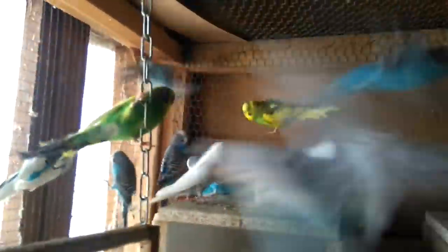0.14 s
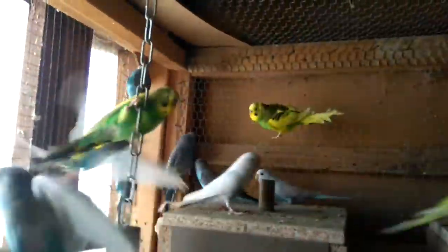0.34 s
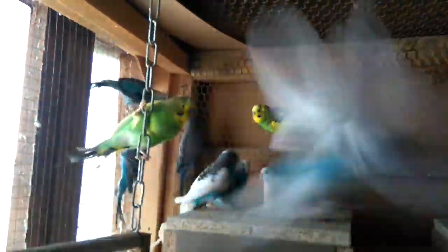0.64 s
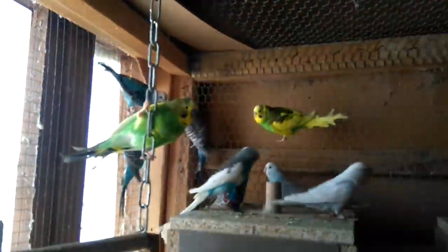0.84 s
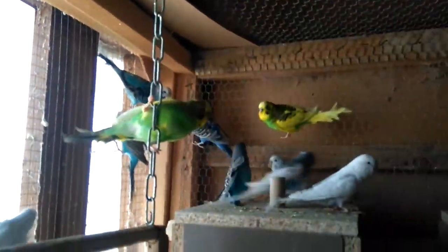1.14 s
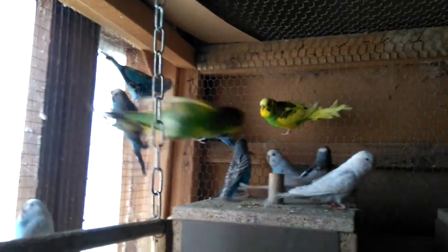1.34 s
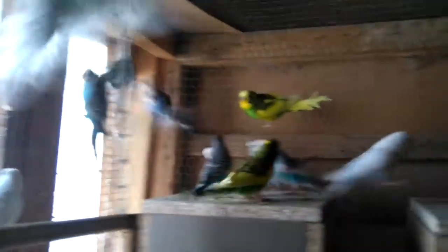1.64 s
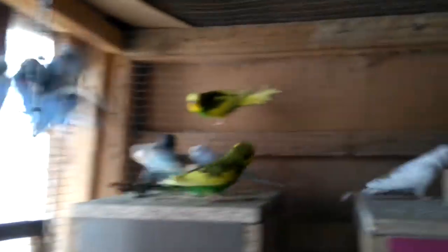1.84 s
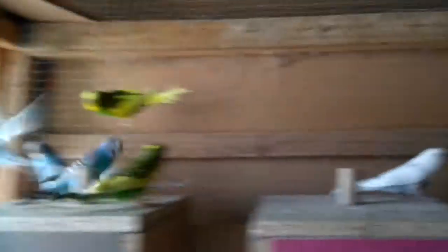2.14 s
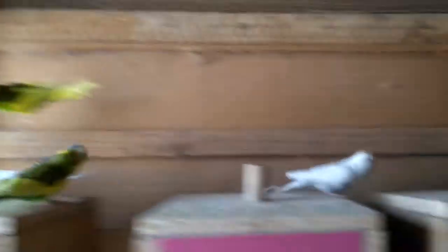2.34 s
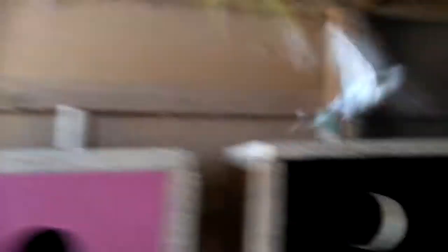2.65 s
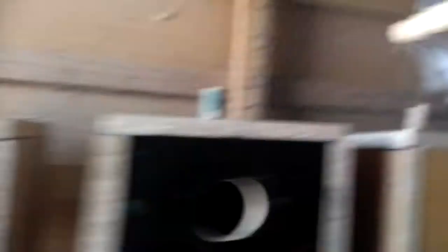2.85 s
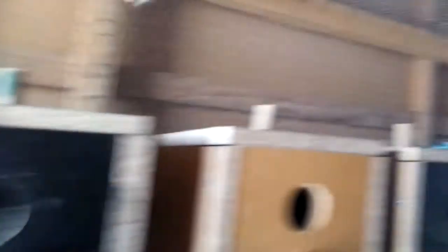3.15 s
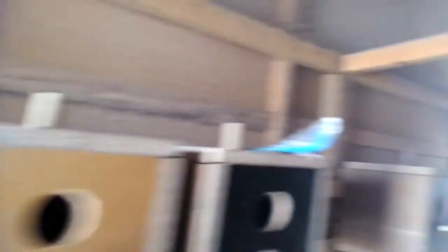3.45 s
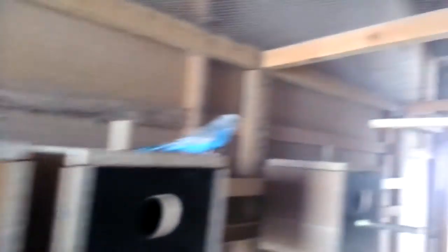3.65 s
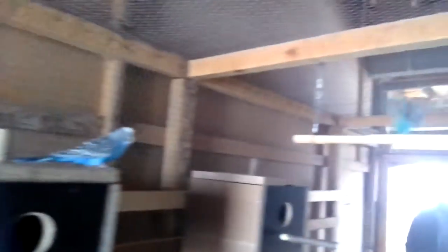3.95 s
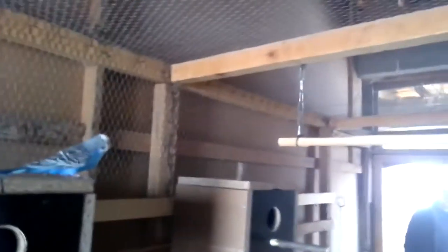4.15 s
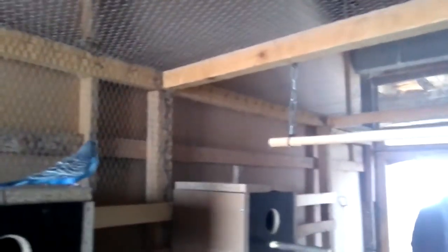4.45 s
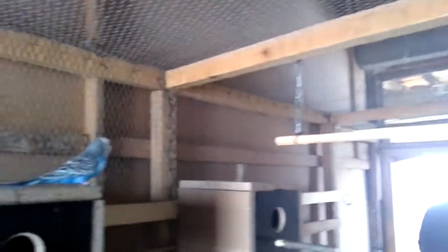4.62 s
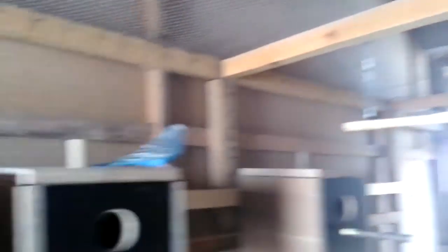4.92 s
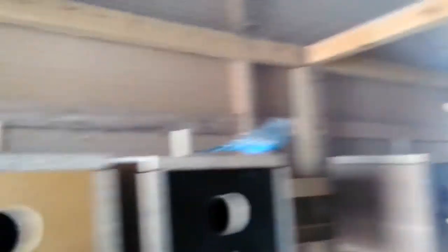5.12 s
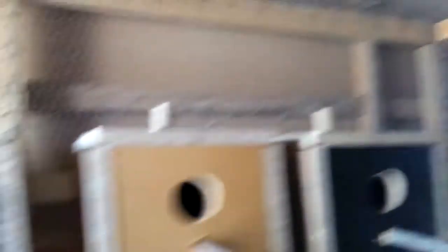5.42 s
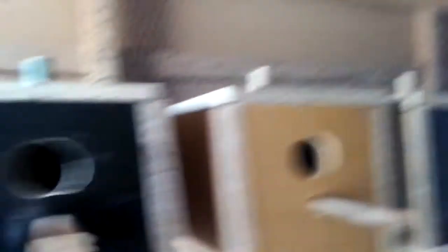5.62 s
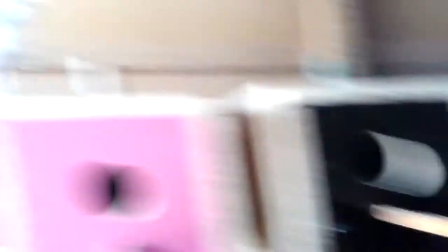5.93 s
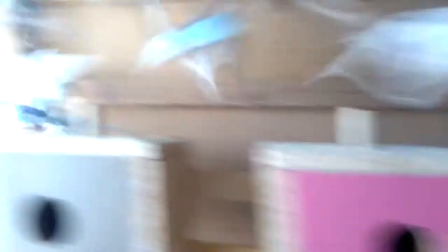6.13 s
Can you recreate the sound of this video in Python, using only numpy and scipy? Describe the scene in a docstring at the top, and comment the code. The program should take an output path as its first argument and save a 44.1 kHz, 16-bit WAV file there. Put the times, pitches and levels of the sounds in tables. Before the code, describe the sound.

Inside a wooden aviary, small parrots chirrup and squawk with fluttering wings. After a short calmer gap near one second, calls return harder with sharp snaps and close wing puffs, then bright whistles and screeches. Calls thin out after five seconds and fluttering swells again at the end. Close stereo microphones, calls leaning left, short wooden echoes.

```python
"""Small parrots in a wooden aviary

Small parrots chirp, squawk and flutter about, heard by a pair of microphones with open ports.
Noise bursts shaped by throat and beak resonances make the harsh calls; gliding near sines make the clear notes.
Calls and sharp snaps reach the left port first and ring off the boards as decaying random echoes.
Beating noise makes the wings' whirr and draught, short pushes blow over the ports, and a wide rustle lies below.
"""
import sys
import numpy as np
from scipy import signal
from scipy.fft import rfft, irfft
from scipy.io import wavfile
from scipy.ndimage import uniform_filter1d

SR = 44100
rng = np.random.default_rng(int(sys.argv[2]) if len(sys.argv) > 2 else 0)


def ratio_of_db(decibels):
    """Turn decibels (scalar or array-like) into linear amplitude factors; 0 dB maps to 1."""
    return 10 ** (np.asarray(decibels, float) / 20)


def wav_record(signal):
    """Record a signal, one row per channel, as 16-bit PCM in the file named by sys.argv[1]."""
    frames = np.transpose(np.atleast_2d(signal))
    bounded = np.clip(frames, -1, 1)
    # unit amplitude maps onto the largest positive 16-bit level
    quanta = np.round(bounded * 32767).astype(np.int16)
    wavfile.write(sys.argv[1], SR, quanta)


N = 276948  # samples in the scene


def evened(x):
    """Normalisation: scales a signal to rms 1."""
    return x / np.sqrt(np.mean(x ** 2) + 1e-20)


def read(points, hz):
    """Interpolation of a spectrum along a log-frequency axis."""
    point_hz, value = np.transpose(points)
    return np.interp(np.log(hz + 1), np.log(point_hz + 1), value)


def played(rows):
    """Linear interpolation in time: each column of a curve, one value a sample."""
    s, *columns = np.transpose(rows)
    return [np.interp(np.arange(N) / SR, s, column) for column in columns]


def coloured(x, points):
    """Linear filtering: multiplies the spectrum by a gain curve in dB."""
    return irfft(rfft(x) * ratio_of_db(read(points, np.fft.rfftfreq(N, 1 / SR))), N)


def wobble(n, per_s):
    """Low-pass random modulation: noise averaged twice over 1 / per_s seconds, near rms 1."""
    width = max(int(SR / per_s), 2)
    noise = rng.standard_normal(n + 2 * width)
    smooth = uniform_filter1d(uniform_filter1d(noise, width), width)
    return evened(smooth)[width:][:n]


def add(mix, s, sound):
    """Superposition: mixes a sound in at s seconds."""
    part = mix[..., round(s * SR):][..., :sound.shape[-1]]
    part += sound[..., :part.shape[-1]]


def resonate(x, hz, width_hz):
    """Moving resonance by heterodyning: shifts the curve hz to zero, smooths three times, shifts back."""
    turn = np.exp(2j * np.pi * np.cumsum(hz) / SR)
    r = np.exp(-np.pi * width_hz / SR)
    smooth = x / turn
    for _ in range(3):
        smooth = signal.lfilter([1 - r], [1, -r], smooth)
    return evened((turn * smooth).real)


# Likeness of the noise at the two ports; columns: frequency_hz, likeness (0 to 1, no unit)
PORT_LIKENESS = [(100, .55), (300, .7), (600, .55), (1400, 0)]


def port_pair(points):
    """Partial coherence: noise at both ports, alike in the bass only."""
    same = np.clip(read(PORT_LIKENESS, np.fft.rfftfreq(N, 1 / SR)), -1, 1)
    a, b = rfft(rng.standard_normal((2, N)))
    pair = irfft([a, same * a + np.sqrt(1 - same ** 2) * b], N)
    return evened(coloured(pair, points))


def syllable(s, length, db):
    """Amplitude envelope: the samples of one sound and its rounded swell, alike for every row."""
    loudest_at = 0.43  # share of the length
    rise_db, fall_db = 13, 12
    u = np.arange(-.3, 1.3, 1 / (length * SR))  # time in lengths, with margins
    at = np.clip(np.round((s + u * length) * SR).astype(int), 0, N - 1)
    rise = np.maximum(1 - u / loudest_at, 0)
    fall = np.maximum((u - loudest_at) / (1 - loudest_at), 0)
    return at, ratio_of_db(db - rise_db * rise ** 1.4 - fall_db * fall ** 1.3)


USUAL_DB = -24  # level at which a call has its usual width or pitch


def voice_box():
    """Relaxation oscillation: the voice box sputters in uneven bursts of a few ms, its pitch never still."""
    turns = np.cumsum(280 * (1 + .35 * wobble(N, 150))) / SR  # about 280 bursts per s
    bursts = np.exp(-(turns % 1) / 0.14) * ratio_of_db(4.34 * wobble(N, 106))
    return bursts, wobble(N, 110.2)


# Rough throaty calls, and a low scrape or wing rustle near 5.75 s
# columns: start_s, length_s, level_db, resonance_hz
CHIRRUPS = [(-0.012, 0.033, -20, 3047), (0.073, 0.18, -23, 3206), (0.196, 0.03, -17.5, 3650),
            (0.261, 0.13, -21.5, 2970), (0.449, 0.1, -22, 2724), (0.502, 0.36, -40, 3100),
            (1.114, 0.12, -22.5, 3024), (1.415, 0.077, -31.5, 3395), (1.495, 0.15, -19.5, 3093),
            (1.633, 0.066, -20, 4065), (1.827, 0.086, -32.5, 2960), (1.916, 0.12, -35.5, 2915),
            (2.058, 0.095, -23, 3360), (2.224, 0.12, -23, 2855), (2.443, 0.13, -28, 2760),
            (2.624, 0.097, -21.5, 3330), (2.691, 0.112, -19.5, 3230), (2.885, 0.12, -17, 3250),
            (3.071, 0.12, -21, 3835), (3.415, 0.27, -18.5, 3606), (3.853, 0.47, -37.5, 3564),
            (4.303, 0.12, -34, 3040), (4.397, 0.14, -22, 3263), (4.582, 0.15, -19, 3490),
            (4.747, 0.2, -22.5, 3430), (5.147, 0.17, -27.5, 2780), (5.38, 0.21, -38.5, 3230),
            (5.747, 0.1, -37, 1148), (5.8, 0.11, -38, 3010), (6.057, 0.072, -41, 2550)]


def chirrups(bursts, warble):
    """Source and filter: the bursts ring in a resonance beside a pulsing tone; the low scrape is made alike."""
    out = np.zeros(N)
    sputter = (0.2 + bursts) * rng.standard_normal(N)
    pulsing = evened(uniform_filter1d(0.018 + bursts, 40))
    for s, length, db, hz in CHIRRUPS:
        at, swell = syllable(s, length, db)
        width_hz = 1300 + 25 * (db - USUAL_DB)  # a harder call rasps over a wider band
        pitch_hz = hz + .3 * width_hz * warble[at]
        voiced = pulsing[at] * np.sin(2 * np.pi * np.cumsum(pitch_hz) / SR)
        moving_ring = resonate(sputter[at], pitch_hz, width_hz)
        fixed_ring = resonate(sputter[at], np.full(len(at), hz), 1550)
        out[at] += swell * (1.3 * voiced + 0.7 * moving_ring + 0.57 * fixed_ring)
    return out


# Hissing calls from the open beak, with faint stretches of high background hiss
# columns: start_s, length_s, level_db
SCREECHES = [(-0.007, 0.026, -30.5), (0.07, 0.13, -26.5), (0.204, 0.056, -19), (0.232, 0.17, -34),
             (0.345, 0.43, -35.5), (1.083, 0.17, -36.5), (1.328, 0.37, -39.5), (1.535, 0.077, -15),
             (1.641, 0.074, -18.5), (1.788, 0.097, -35), (1.864, 0.043, -26.5), (1.91, 0.048, -39),
             (1.954, 0.076, -32), (2.072, 0.1, -26), (2.173, 0.19, -32), (2.47, 0.1, -30),
             (2.598, 0.093, -31), (2.701, 0.11, -14), (2.875, 0.12, -15.5), (3.077, 0.094, -15),
             (3.396, 0.21, -17.5), (3.61, 0.19, -33.5), (3.91, 0.21, -28), (4.166, 0.13, -38),
             (4.311, 0.17, -22.5), (4.488, 0.12, -25), (4.55, 0.24, -29), (4.742, 0.12, -14.5),
             (4.866, 0.13, -35), (5.073, 0.29, -31.5), (5.433, 0.13, -37), (5.575, 0.1, -38),
             (5.952, 0.13, -37.5), (6.092, 0.11, -35.5), (6.183, 0.097, -31)]
# Spectrum of the wide hiss; columns: frequency_hz, density_db (per Hz)
SCREECH_SPECTRUM = [(2350, -32), (4000, 0.5), (9270, 0), (13100, -15.5), (14400, -25), (15000, -61)]


def screeches(bursts, warble):
    """Turbulence: noise in bursts, wide and around a wavering resonance; faint rows are background hiss."""
    out = np.zeros(N)
    hiss = (.5 + bursts) * rng.standard_normal(N)
    wide = evened(coloured(hiss, SCREECH_SPECTRUM))
    for s, length, db in SCREECHES:
        at, swell = syllable(s, length, db)
        centre_hz = 7100 - 90 * (db - USUAL_DB)  # a harder screech opens the beak and hisses lower
        ring = resonate(hiss[at], centre_hz + 600 * warble[at], 2800)
        out[at] += swell * (1.21 * wide[at] + 0.51 * ring)
    return out


def squawks():
    """Common excitation: the same bursts drive both the throaty and the hissing sounds."""
    bursts, warble = voice_box()
    return chirrups(bursts, warble) + screeches(bursts, warble)


# Clear ringing notes; columns: start_s, length_s, first_hz, last_hz, level_db
NOTES = [(0.1, 0.04, 3970, 3680, -17), (0.141, 0.05, 2664, 2724, -17.5), (0.26, 0.014, 3840, 3630, -17.5),
         (0.292, 0.029, 2720, 2980, -14), (0.34, 0.049, 2930, 2950, -25), (0.464, 0.032, 2620, 2914, -13),
         (0.5, 0.03, 1912, 1665, -30), (0.512, 0.041, 3027, 3120, -17.5), (1.36, 0.13, 3150, 4000, -38),
         (1.45, 0.076, 6800, 7000, -30.5), (1.574, 0.046, 2940, 3070, -23), (1.882, 0.061, 6750, 6650, -32),
         (2.098, 0.0526, 4120, 3533, -14.5), (2.148, 0.018, 2950, 2747, -8.5),
         (2.256, 0.039, 2960, 3000, -19), (2.505, 0.071, 6700, 6760, -30), (2.522, 0.032, 2700, 2610, -25),
         (2.63, 0.025, 4710, 3640, -23), (2.653, 0.043, 3524, 3430, -13), (3.405, 0.046, 6260, 5990, -20.5),
         (3.485, 0.055, 6010, 6730, -16), (3.535, 0.06, 6170, 5610, -18), (3.596, 0.04, 4340, 3800, -11.5),
         (3.626, 0.019, 3710, 3870, -14.5), (3.658, 0.0088, 2810, 2660, -16.5),
         (4.359, 0.051, 6400, 6500, -23), (4.428, 0.016, 3270, 3345, -11.5),
         (4.48, 0.0075, 3380, 3540, -18), (4.504, 0.034, 6200, 6060, -23),
         (4.553, 0.059, 6360, 6380, -26.5), (4.615, 0.035, 2770, 2936, -22), (4.665, 0.02, 3910, 4140, -20),
         (4.771, 0.14, 4780, 4940, -20.5), (4.79, 0.045, 6780, 7100, -15), (4.83, 0.087, 2518, 2920, -21.5),
         (4.839, 0.091, 6360, 6170, -25.5), (5.201, 0.02, 2736, 2690, -20), (5.221, 0.026, 2050, 2020, -26),
         (5.985, 0.01, 3975, 4070, -28.5)]
# Whistles whose second harmonic leads; columns: start_s, length_s, first_hz, last_hz, level_db
WHISTLES = [(3.362, 0.081, 2100, 2313, -23), (3.97, 0.097, 2450, 2600, -26.5),
            (4.325, 0.083, 2546, 2492, -22.5), (4.527, 0.038, 2633, 2690, -17.5)]
# Harmonics 1, 2, 3 of a note; column: level_db
NOTE_HARMONICS = [2, -27.5, -60]
# Harmonics 1, 2, 3 of a whistle; column: level_db
WHISTLE_HARMONICS = [-6, 4, -7.5]


def notes():
    """Frequency and amplitude modulation: gliding tones that quiver in pitch and stutter in level."""
    out = np.zeros(N)
    quiver, stutter = wobble(N, 490), wobble(N, 186)
    for rows, harmonics_db in (NOTES, NOTE_HARMONICS), (WHISTLES, WHISTLE_HARMONICS):
        for s, length, first_hz, last_hz, db in rows:
            n, at = round((length + 0.00976) * SR), round(s * SR)  # room for the fades
            angle = 2 * np.pi * np.cumsum(np.linspace(first_hz, last_hz, n)) / SR
            shake = 2 * np.pi * np.cumsum(85 * quiver[at:at + n]) / SR  # 85 Hz rms
            tone = sum(ratio_of_db(h) * np.sin((k + 1) * angle + shake) for k, h in enumerate(harmonics_db))
            level = ratio_of_db(db + 2.73 * stutter[at:at + n])
            add(out, s - .004, level * tone * signal.windows.tukey(n, .7))
    return out


# Claws and quills snapping on the wire mesh; columns: start_s, level_db, knock_over_crack_db
SNAPS = [(1.503, -1.5, -44), (1.5085, -11, -27), (1.832, -11.5, 13), (1.84, -23, -12), (1.9389, -10.5, 3),
         (2.0519, -16, 4), (2.1264, -12, 7), (3.0724, -22.5, 14), (6.0966, -18.5, 11), (6.1664, -15, -17)]


def snaps():
    """Impact and decay: a sharp bright crack that dies in a few ms, with a duller knock under it."""
    crack, knock, t = np.zeros(N), np.zeros(N), np.arange(900) / SR
    for (s, db, knock_db), hiss in zip(SNAPS, rng.standard_normal((len(SNAPS), 900))):
        add(crack, s, ratio_of_db(db - 60 * t / 0.0082) * hiss)  # 60 dB down in 8.2 ms
        add(knock, s, ratio_of_db(db + knock_db - 60 * t / 0.025) * hiss)
    bright = coloured(crack, [(3000, -8.5), (6000, 1.5), (9500, 10.0), (14000, -8.5)])
    dull = coloured(knock, [(300, -14), (900, -9.5), (4000, -12.5), (7000, -28)])
    return bright + dull


# Flutter of the wings; columns: time_s, whirr_db, draught_over_whirr_db
WINGS = [(0.0, -32, -16), (0.84, -48, -4.5), (1.48, -40.5, -15), (1.57, -39, 4), (1.87, -38, -10),
         (2.69, -39.5, 0), (3.32, -44, -21), (3.81, -46, -3.5), (4.2, -45, -23), (4.56, -64.5, -12),
         (5.39, -41.5, -27), (5.72, -52.5, 3.5), (5.75, -48.5, -8), (5.95, -49.5, -9), (6.12, -35, -22),
         (6.28, -32, -6)]
# Spectrum of the whirr; columns: frequency_hz, density_db (per Hz)
WHIRR = [(71, -52), (120, -10.5), (304, -1.5), (529, 2), (1320, -17.5), (2000, -10), (2600, -1),
         (4400, -120)]
# Spectrum of the draught on the ports; columns: frequency_hz, density_db (per Hz)
DRAUGHT = [(18, -36), (30, -6), (64, 13), (250, -6), (320, -40), (550, -120)]


def wings():
    """Periodic flow noise: feathers push air at each stroke, and the draught rumbles in lumps."""
    whirr_db, draught_db = played(WINGS)
    beats_per_s = 19 * (1 + 0.199 * wobble(N, 3.42))
    strokes = np.cos(2 * np.pi * np.cumsum(beats_per_s) / SR)
    whirr = evened(port_pair(WHIRR) * ratio_of_db(2.8 * strokes + 1.27 * wobble(N, 88)))
    draught = evened(port_pair(DRAUGHT) * ratio_of_db(1.7 * strokes + 0.93 * wobble(N, 6.8)))
    return ratio_of_db(whirr_db) * whirr + ratio_of_db(whirr_db + draught_db) * draught


# Gusts from a wing passing close; columns: start_s, level_db, left_over_right_db
PUFFS = [(1.538, -36, 6), (1.62, -32, 0), (2.146, -30.5, 16), (2.25, -29.5, 27), (2.456, -23, -13),
         (2.52, -33, 12), (2.643, -29, -15), (2.796, -27.5, 14.5), (2.87, -34, -12)]


def puffs():
    """Transient pressure: a low damped push at the ports with a short rough edge."""
    out, t = np.zeros((2, N)), np.arange(2600) / SR
    low_pass = signal.butter(2, 600 / SR * 2)  # 600 Hz
    for (s, db, pan_db), hiss in zip(PUFFS, rng.standard_normal((len(PUFFS), 2600))):
        push = np.sin(2 * np.pi * 95 * t) * np.exp(-t / 0.005)
        edge = evened(signal.lfilter(*low_pass, hiss)) * t / 0.0049 * np.exp(-t / 0.0045)
        level = ratio_of_db(db + np.array([[.5], [-.5]]) * pan_db)
        add(out, s, level * (1.54 * push + 1.2 * edge))
    return out


# Spectrum of the rustle and far chatter; columns: frequency_hz, density_db (per Hz)
FLOOR = [(18, -38), (30, -5.5), (597, -6.5), (1440, -6.5), (3880, 0), (5170, -15), (9150, -14),
         (12800, -22.5), (15000, -28)]


def rustle():
    """Diffuse noise floor: a wide rustle and far chatter that swell with the flutter."""
    whirr_db = played(WINGS)[0]
    level_db = -38 + 0.4 * (whirr_db - whirr_db.mean()) + 2.47 * wobble(N, 24)
    return ratio_of_db(level_db) * port_pair(FLOOR)


# Decay time of the boards' echoes; columns: frequency_hz, t60_s
BOARDS = [(2000, 0.16), (9000, 0.076)]
# Balance of the two ports; columns: frequency_hz, left_over_right_db
PORTS = [(500, 0), (1300, 1.5), (2400, 4.5), (8000, 3.5), (14000, -3)]


def aviary(x):
    """Reverberation: board echoes differ per port and shift steadily between three patterns; left hears first."""
    taps = np.zeros((6, SR // 4))  # three echo patterns, two ports each
    slots = np.arange(100, SR // 4 - 20, 20)
    at = slots + rng.integers(0, 20, (6, (SR // 4 - 101) // 20))
    np.put_along_axis(taps, at, rng.choice([-1., 1.], at.shape), 1)
    hz, t, z = signal.stft(taps, SR, nperseg=128)
    decay = ratio_of_db(-60 * t / read(BOARDS, hz)[:, None])
    tail = signal.istft(z * decay, SR, nperseg=128)[1]
    tail /= np.linalg.norm(tail, axis=1)[:, None]
    # the patterns take turns at 6.5 Hz; the squares of their shares sum to 1
    turn = 2 * np.pi * (np.arange(N) * 6.5 / SR + np.arange(6)[:, None] // 2 / 3)
    shares = np.sqrt(2 / 3) * np.cos(turn)
    echoes = signal.fftconvolve(x * shares, tail, axes=1)[:, :N].reshape(3, 2, N).sum(0)
    direct = np.array([x, np.roll(x, 13)])  # the right port lags by 13 samples
    left, right = ratio_of_db(-8.5) * direct + ratio_of_db(-.7) * echoes
    left = coloured(left, [(f, db / 2) for f, db in PORTS])
    right = coloured(right, [(f, -db / 2) for f, db in PORTS])
    return np.array([left, right])


def scene():
    """Superposition of sources: calls and snaps in the room, wings, gusts and rustle at the ports."""
    in_room = aviary(squawks() + notes() + snaps())
    return ratio_of_db(-0.77) * in_room + wings() + puffs() + rustle()


def band_limit(x):
    """A steep low-pass at the top of the band."""
    return signal.sosfilt(signal.butter(12, 15260, fs=SR, output="sos"), x)


# Microphone response, a low cut and nearly flat above; columns: frequency_hz, gain_db
MIC = [(30, -14), (50, 0), (4500, 0), (5150, 0), (5800, 1.5)]


def record(dry):
    """Saturation and band limiting: the microphones' colour, a soft overload on the loudest calls, a top edge."""
    loaded = 0.98 * np.tanh(coloured(dry, MIC) / 1.001)
    below_edge = np.fft.rfftfreq(N, 1 / SR) < 15200  # Hz
    limited = irfft(rfft(loaded) * below_edge, N)
    return band_limit(limited)


dry = scene()
out = record(dry)
wav_record(out)
```